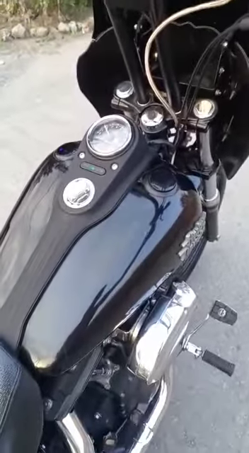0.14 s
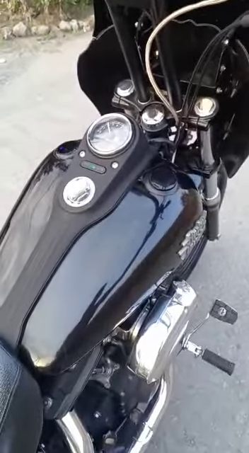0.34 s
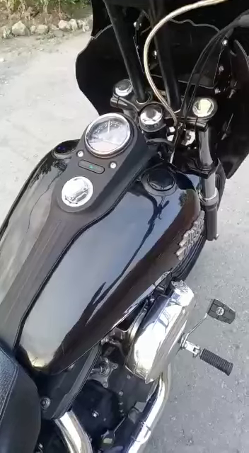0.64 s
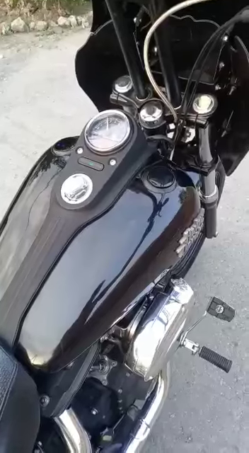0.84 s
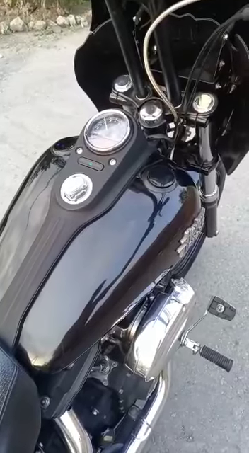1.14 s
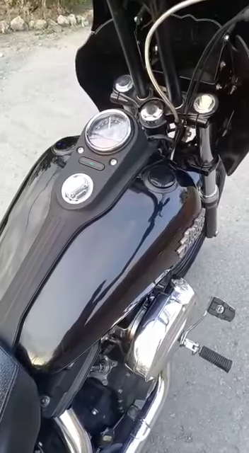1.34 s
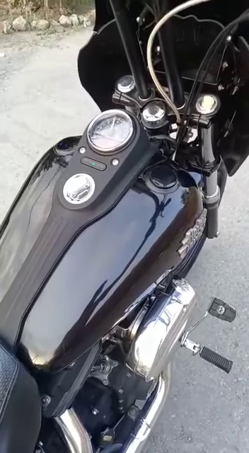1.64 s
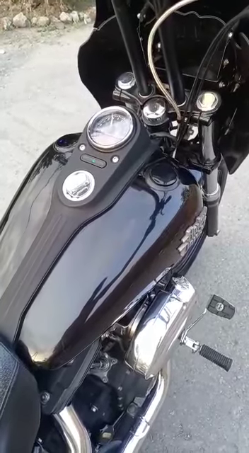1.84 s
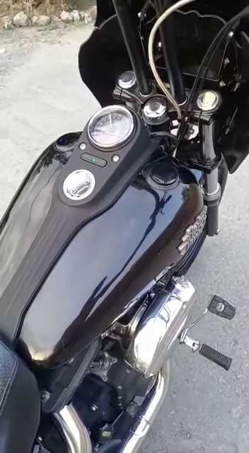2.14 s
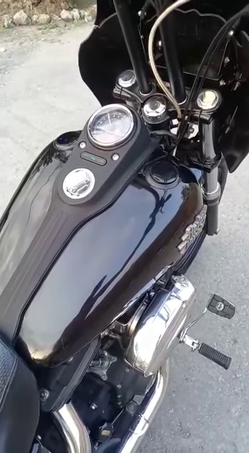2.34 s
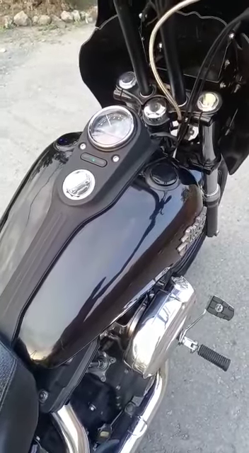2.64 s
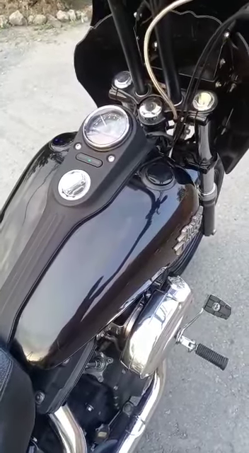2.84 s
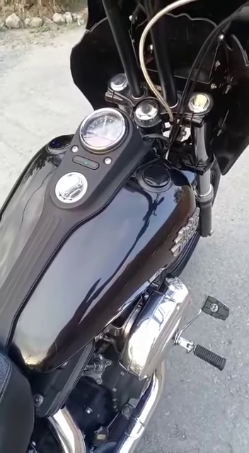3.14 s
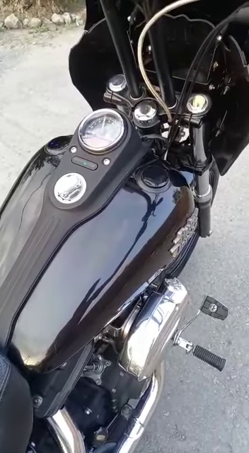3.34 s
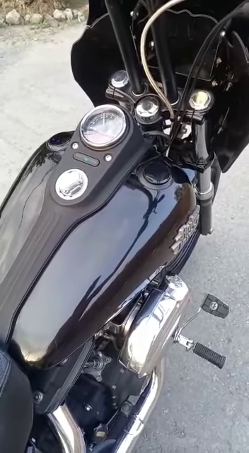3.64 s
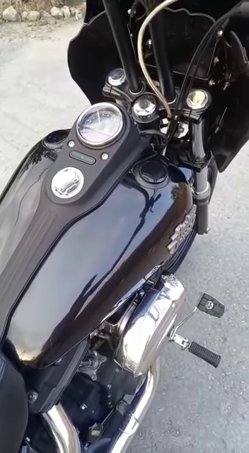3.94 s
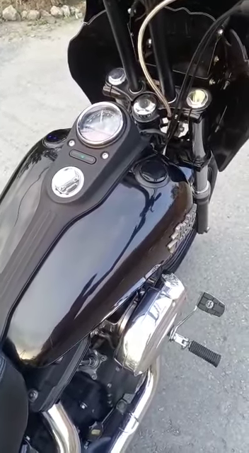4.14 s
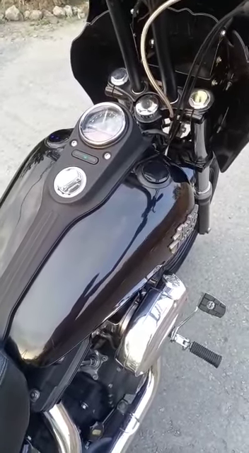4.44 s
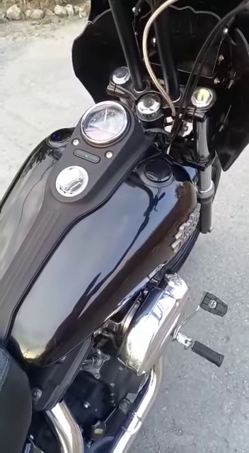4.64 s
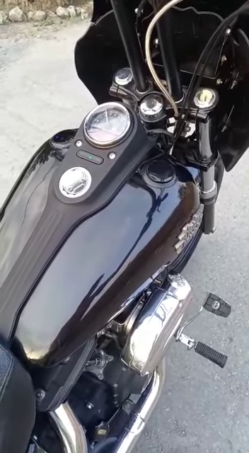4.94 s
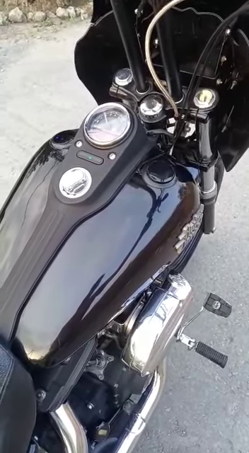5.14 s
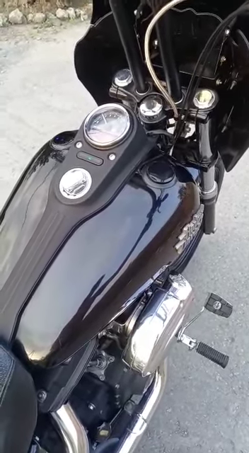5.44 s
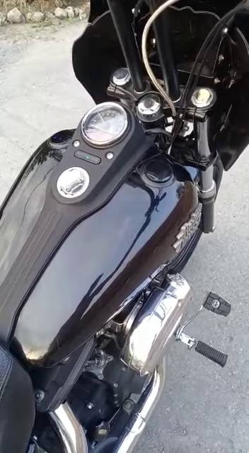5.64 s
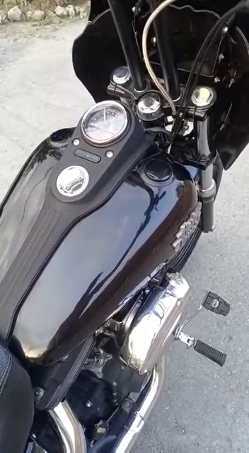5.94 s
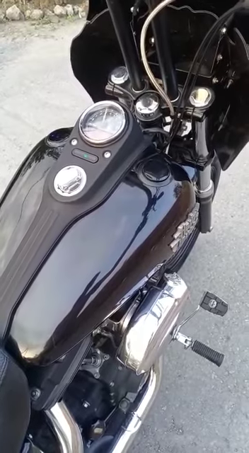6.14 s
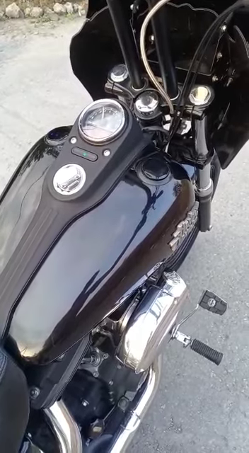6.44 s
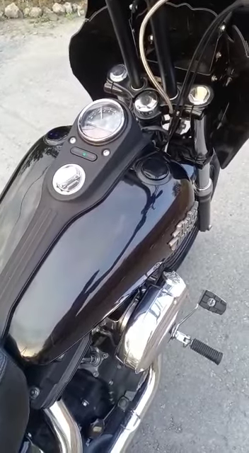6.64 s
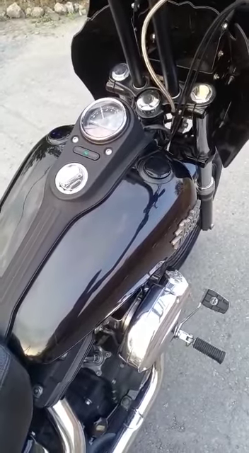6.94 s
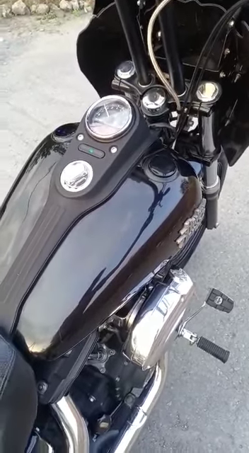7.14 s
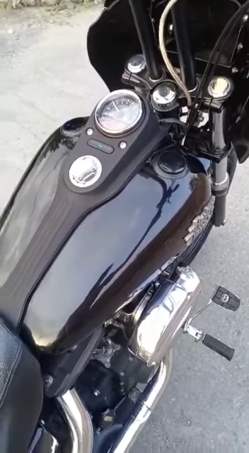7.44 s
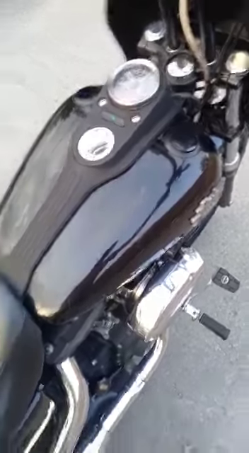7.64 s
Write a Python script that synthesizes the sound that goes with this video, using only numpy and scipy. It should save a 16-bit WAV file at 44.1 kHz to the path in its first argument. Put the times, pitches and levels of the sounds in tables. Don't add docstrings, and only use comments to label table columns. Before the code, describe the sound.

Five sharp throttle blips on a big twin-cylinder motorbike outdoors, loud cracking barks between uneven, thumping, ticking coasts back towards idle.

```python
import sys
import numpy as np
from scipy import signal
from scipy.fft import rfft, irfft, next_fast_len
from scipy.io import wavfile
from scipy.ndimage import uniform_filter1d

SR = 44100
rng = np.random.default_rng(int(sys.argv[2]) if len(sys.argv) > 2 else 0)


def volts_from_db(level):
    exponent = np.asarray(level, float) / 20
    return 10 ** exponent


def store_wav(level_fs):
    pcm = np.round(np.clip(np.atleast_2d(level_fs), -1, 1) * 32767)
    wavfile.write(sys.argv[1], SR, pcm.T.astype(np.int16))


N = 343098

# (cracked [s], open [s], full [s], shut [s], bark level [dB])
THROTTLE = [
    (.045, .075, .15, .25, -12.5),
    (1.04, 1.066, 1.15, 1.272, -11.5),
    (2.704, 2.798, 2.89, 2.972, -11),
    (3.82, 3.862, 3.96, 4.04, -11),
    (5.586, 5.672, 5.8, 5.858, -11),
]
CRACKED_DB, OPEN_DB, SHUT_DB = -14, -4, -4
TWIST_S, CLOSE_S = .022, .03
LET_GO_S = .014
BUILD_S = .035

# (first firing [s], start speed [cycles/s], top [s], top speed [cycles/s], climb
BLIPS = [
    (-.004, 9.4, .32, 26.5, .9),
    (1.041, 16.06, 1.298, 32.8, 1.056),
    (2.703, 11.9, 2.994, 31.03, 1.04),
    (3.801, 15.64, 4.062, 33.1, 1.13),
    (5.55, 10.5, 5.873, 31.37, 1.41),
]
COAST_S, IDLE_PER_S = 1.39, 9.6

# (frequency [Hz], width [Hz], level [dB])
PIPE_HOT = [(84, 31, 0), (152, 32, -11.5)]
# (frequency [Hz], width [Hz], level [dB])
PIPE_IDLE = [(86, 18, 0), (122, 45, -11), (180, 60, -19)]
# (frequency [Hz], width [Hz], level [dB])
PIPE_MOUTH = [(270, 60, -19)]
# (speed [cycles/s], pipe thump [dB], rasp [dB])
COASTING = [(9.9, -23.5, -44), (13.4, -23.5, -39), (18.1, -19, -36.5), (21.73, -19.5, -28.5),
            (27.35, -11.5, -31.5), (31.3, -12, -28.5)]
LOADED = {"thump": -11, "rasp": -19, "clatter": -34.5, "rattle": -28, "hiss": -12.5}
# (time [s], level change [dB])
BURNS = [(0, 13.5), (.36, 4), (.62, 2.5), (.76, 5.5), (.83, 5), (.88, 1), (2.11, 1), (2.14, -12),
         (2.4, 1.5), (2.703, 6), (2.735, -9), (3.55, 3), (4.76, -0.5), (4.84, -1.5), (5.14, 5.5),
         (5.37, 6.5), (5.42, -9), (6.51, 0), (7.13, -3), (7.22, 4), (7.36, -8), (7.4, 1.5), (7.55, -6),
         (7.6, 5), (7.67, 7), (7.74, -1), (7.78, 8)]
BURN_S = 0.013
GASP_DB, GASP_LAG_S, GASP_S = -10.5, 0.018, 0.015

# (share of a cycle [-], level [dB])
VALVES = [(0, -11), (.22, -15), (.48, -1), (.7, -26), (.88, 0.5)]
# (frequency [Hz], width [Hz], level [dB])
COVERS = [(944, 86, 3), (1538, 194, 1), (2310, 154, 3), (2590, 28, -11.5), (3527, 123, 0), (4900, 96, -7),
          (5230, 33, -16), (5960, 89, -2), (12000, 250, -18)]
# (frequency [Hz], width [Hz], level [dB])
PUMP = [(6190, 290, -5), (12500, 300, -12)]
# (frequency [Hz], density [dB/Hz])
CASES = [(710, -37), (1200, -3), (1550, -0.5), (1840, -4), (2240, 1), (2500, 1), (2920, 0.5), (3250, -7.5),
         (3650, -3.5), (4360, -9.5), (4860, -7.5), (5670, -9), (6170, -11.5), (6660, -9.5), (7600, -33.5),
         (9880, -54), (16700, -120)]
# (frequency [Hz], density [dB/Hz])
RASP = [(110, 0), (190, 0.5), (285, 1), (317, 1.5), (480, -6.5), (620, -58), (1060, -120)]
# (frequency [Hz], density [dB/Hz])
RATTLE = [(260, -47), (450, 0), (684, 2), (915, -1.5), (1070, -4.5), (1250, -11.5), (1620, -8.5),
          (2750, -120)]
# (frequency [Hz], density [dB/Hz])
HISS = [(4290, -38), (7300, -13.5), (7560, -9.5), (8430, -8), (9860, -3), (12100, -1.5), (15700, -2)]
CLATTER_DB, CLATTER_DB_PER_OCTAVE = -30.5, 12
RATTLE_DB, RATTLE_DB_PER_OCTAVE = -36.5, 8.5
HISS_DB = -14
STREET_DB = -52
# (time [s], gear level [dB])
GEAR_DRIFT = [(0, 2.5), (1, 0.5), (2.5, 0.5), (5, -0.5), (7.78, 1.5)]

# (frequency [Hz], width [Hz], level [dB])
TAPPET = [(1520, 70, 0), (2450, 110, -3)]
TAPPET_DB = -52

# (frequency [Hz], width [Hz], level [dB])
CRACK = [(250, 75, -2.5), (620, 150, -24), (122, 88, -2.5)]
# (frequency [Hz], width [Hz], level [dB])
AIRBOX = [(262, 34, 0), (600, 100, -28)]
# (frequency [Hz], density [dB/Hz])
SPIT = [(500, -24), (950, 9), (1500, -7), (2500, 9), (3400, -7), (7600, -28), (12000, -14), (16000, -14)]

# (time [s], peak [dB])
SNAPS = [
    (.259, -20),
    (1.277, -8.5),
    (2.975, -8.5),
    (4.042, -9),
    (5.588, -19),
    (5.856, -15),
]
# (time [s], frequency [Hz], level [dB])
WHINE = [
    (7.48, 624, -51),
    (7.516, 648, -60),
    (7.53, 657, -49),
    (7.564, 604.4, -48),
    (7.768, 590, -53),
    (7.78, 596, -43),
]

# (frequency [Hz], correlation [-])
ALIKE = [(60, 0.98), (130, 0.97), (290, 0.9), (640, 0.46), (1410, -0.02), (3100, 0.17), (6820, 0.09),
         (15000, -0.03)]
# (frequency [Hz], left minus right [dB])
LEAN = [(60, -0.5), (92, -0.5), (140, 0.0), (210, -0.5), (330, -1.0), (500, -2.5), (770, -2.0), (1170, 2.5),
        (1790, 1.5), (2740, -3.0), (4190, 6.5), (6410, 9.0), (9810, 0.5), (15000, -3.0)]
# (frequency [Hz], phase [rad])
LATE = [(40, .14), (85, .21), (170, .27), (400, .42)]
TOP_HZ = 15800


def unit(x):
    return x / np.sqrt(np.mean(x ** 2) + 1e-20)


def steady(x, span_s):
    power = np.abs(uniform_filter1d(x ** 2, int(span_s * SR)))
    return x / np.sqrt(power + 1e-9)


def along(points, hz):
    f, v = np.transpose(points)
    return np.interp(np.log(hz + 1), np.log(f + 1), v)


def curves(rows, outside=None):
    s, *cols = np.transpose(rows)
    return [np.interp(np.arange(N) / SR, s, col, outside, outside) for col in cols]


def filtered(x, response):
    m = next_fast_len(N + SR // 2)
    hz = np.fft.rfftfreq(m, 1 / SR)
    return irfft(rfft(x, m) * response(hz), m)[..., :N]


def modes(table):
    def response(f):
        total = 0
        for k, (center, width, db) in enumerate(table):
            damping = 1j * f * width
            total = total + (-1) ** k * volts_from_db(db) * damping / (center ** 2 - f * f + damping)
        return total
    return response


def soft(edge_hz):
    return lambda f: 1 / (1 - (f / edge_hz) ** 2 + 1.2j * f / edge_hz) ** 2


def speed(t):
    blips = np.array(BLIPS)
    current = np.maximum(np.searchsorted(blips[:, 0], t, "right") - 1, 0)
    start, low, top_s, top, bend = blips[current].T
    climb = low + (top - low) * np.clip((t - start) / (top_s - start), 0, 1) ** bend
    run_down = np.exp(-np.maximum(t - top_s, 0) / COAST_S)
    return np.maximum(climb * run_down, IDLE_PER_S)


def throttle():
    load = 0
    for cracked_s, open_s, full_s, shut_s, db in THROTTLE:
        path = [(cracked_s - TWIST_S, db - 15),
                (cracked_s, db + CRACKED_DB),
                (max(cracked_s, open_s - TWIST_S) + .001, db + CRACKED_DB + 3),
                (open_s, db + OPEN_DB),
                (full_s, db),
                (shut_s - CLOSE_S, db - 2),
                (shut_s, db + SHUT_DB),
                (shut_s + LET_GO_S, db - 18)]
        load = load + volts_from_db(curves(path, outside=-83)[0])
    return load


def strokes(share, lag_s, scatter_db, jitter_s):
    times = []
    starts = [row[0] for row in BLIPS]
    for start, end in zip(starts, starts[1:] + [N / SR]):
        t = np.arange(start, end, 1 / 1000)
        cycles = np.cumsum(speed(t)) / 1000
        times.append(np.interp(np.arange(share % 1, cycles[-1] - .3, 1), cycles, t))
    at = np.clip((np.concatenate(times) + lag_s) * SR, 0, N - 1).astype(int)
    chance = rng.standard_normal((len(at), 2))
    size = volts_from_db((scatter_db * np.ones(N))[at] * chance[:, 0])
    shift = (jitter_s * np.ones(N))[at] * SR * chance[:, 1]
    at = np.clip(at + shift, 0, N - 1).astype(int)
    return np.bincount(at, size, N)


def puffs(impulses, rise_s, t60_s):
    t = np.arange(SR // 10) / SR
    swell = (1 - np.exp(-t / rise_s)) * volts_from_db(-60 * t / t60_s)
    return np.abs(signal.fftconvolve(impulses, swell)[:N])


def rush(spectrum):
    def mid_side(hz):
        angle = np.arccos(np.clip(along(ALIKE, hz), -1, 1)) / 2
        return volts_from_db(along(spectrum, hz)) * np.array([np.cos(angle), np.sin(angle)])
    mid, side = filtered(rng.standard_normal((2, N)), mid_side)
    return unit(np.array([mid + side, mid - side]))


def bumps(rows, width_s):
    t = np.arange(N) / SR
    return sum(db * np.exp(-.5 * ((t - s) / width_s) ** 2) for s, db in rows)


def level(shut_db, layer, load):
    share = np.clip((20 * np.log10(load) + 30) / 14, 0, 1)
    return (1 - share) * shut_db + share * LOADED[layer]


def coasting(column):
    table = np.transpose(COASTING)
    return np.interp(speed(np.arange(N) / SR), table[0], table[column])


def exhaust(load):
    slow = np.clip((24 - speed(np.arange(N) / SR)) / 8, 0, 1)
    scatter_db, jitter_s = 1.2 + 1.8 * slow, .0004 + .0015 * slow
    puff = strokes(0, lag_s=-.0035, scatter_db=scatter_db, jitter_s=jitter_s)
    suck = strokes(.5, lag_s=-.0035, scatter_db=scatter_db, jitter_s=jitter_s)
    eddies = (.006 + .016 * slow) * rng.standard_normal(N)
    gas = puff - (.5 + .25 * slow) * suck + eddies
    flow = filtered(gas, soft(190))
    hot = filtered(flow, modes(PIPE_HOT))
    idle = filtered(flow, modes(PIPE_IDLE))
    mouth = filtered(gas, lambda f: modes(PIPE_MOUTH)(f) * soft(500)(f))
    rung = (1 - slow) * (hot + mouth) + slow * idle
    choked = 1 / (1 + 5 * load)
    gasps = bumps([(row[3] + GASP_LAG_S, GASP_DB) for row in THROTTLE], GASP_S)
    thump_db = level(coasting(column=1), "thump", load) + gasps + bumps(BURNS, BURN_S)
    return choked * volts_from_db(thump_db) * steady(rung, span_s=.07)


def gear(load):
    octaves = np.log2(speed(np.arange(N) / SR) / 30)
    clatter_db = level(CLATTER_DB + CLATTER_DB_PER_OCTAVE * octaves, "clatter", load)
    rattle_db = level(RATTLE_DB + RATTLE_DB_PER_OCTAVE * octaves, "rattle", load)
    rasp_db = level(coasting(column=2), "rasp", load)
    hiss_db = level(HISS_DB, "hiss", load)

    ticks = sum(volts_from_db(db) * strokes(share, lag_s=0, scatter_db=3, jitter_s=.0006) for share, db in VALVES)
    beat = puffs(ticks, rise_s=.002, t60_s=.022)
    snap = puffs(ticks, rise_s=.0015, t60_s=.025)
    knocks = puffs(ticks, rise_s=0.0033, t60_s=0.0085) * rng.standard_normal((2, N))

    covers = volts_from_db(-7.5) * unit(filtered(knocks, lambda f: modes(COVERS)(f) ** 2))
    cases = unit(1 + 1.6 * beat) * rush(CASES) + covers
    whistle = volts_from_db(-15) * unit(filtered(rng.standard_normal(N), lambda f: modes(PUMP)(f) ** 2))
    hiss = volts_from_db(hiss_db + 3.5) * unit(1 + 1.9 * snap + 3 * load * snap) * rush(HISS)
    rattle = volts_from_db(rattle_db + 2.0) * unit(1 + 1.0 * beat) * rush(RATTLE) / (1 + 2 * load)
    rasp = volts_from_db(rasp_db + 1) * unit(1 + .6 * beat) * rush(RASP) / (1 + 12 * load)
    clatter_gain = np.hypot(volts_from_db(clatter_db), volts_from_db(STREET_DB))
    return clatter_gain * (cases + hiss + whistle) + rattle + rasp


def tappet():
    strong = strokes(.86, lag_s=0, scatter_db=2, jitter_s=.002)
    weak = strokes(.33, lag_s=0, scatter_db=4, jitter_s=.002)
    knocks = puffs(strong + .6 * weak, rise_s=.001, t60_s=0.0071) * rng.standard_normal((2, N))
    return volts_from_db(TAPPET_DB) * unit(filtered(knocks, lambda f: modes(TAPPET)(f) ** 2))


def barks(load):
    fire = strokes(0, lag_s=-.0018, scatter_db=.7, jitter_s=.0002) * load
    gulp = strokes(.47, lag_s=-.0042, scatter_db=.7, jitter_s=.0004) * load
    regulp = strokes(.47, lag_s=.0034, scatter_db=4, jitter_s=.0003) * load
    crack = volts_from_db(53) * filtered(fire, modes(CRACK))
    airbox = volts_from_db(55.5) * filtered(gulp + .45 * regulp, modes(AIRBOX))

    filled = np.clip(np.roll(load, int(BUILD_S * SR)) / .03, 0, 1)
    filled = filled * 20 / speed(np.arange(N) / SR)
    spits = np.roll(fire / np.sqrt(load + .02) * filled, -int(.006 * SR))
    spit = volts_from_db(-4) * puffs(spits, rise_s=.0015, t60_s=.022) * rush(SPIT)
    breath = volts_from_db(-19.5) * puffs(gulp, rise_s=0.001, t60_s=0.036) * rush(HISS)
    return filtered(crack + airbox, soft(346)) + spit + breath


def snaps():
    out, t = np.zeros(N), np.arange(SR // 20) / SR
    for s, db in SNAPS:
        tone = np.sin(2 * np.pi * (520 * t + 9000 * t ** 2))
        pop = tone * volts_from_db(db - 60 * t / 0.026) * (1 - np.exp(-t / 0.00023))
        out[round(s * SR):][:len(t)] += pop
    return out


def whine():
    hz, db = curves(WHINE)
    flutter = uniform_filter1d(rng.standard_normal(N), int(0.01 * SR))
    fade_in = np.clip((np.arange(N) / SR - WHINE[0][0]) / 0.041, 0, 1)
    wobble_hz = 18 * unit(np.roll(flutter, SR))
    phase = 2 * np.pi * np.cumsum(hz + wobble_hz) / SR
    return volts_from_db(db + 5.5 + 5.1 * unit(flutter)) * fade_in * np.sin(phase)


def scene():
    load = throttle()
    engine = exhaust(load) + volts_from_db(curves(GEAR_DRIFT)[0]) * gear(load) + tappet()
    return engine + barks(load) + snaps() + whine()


def top_cut(x):
    return signal.sosfilt(signal.butter(12, 15820, fs=SR, output="sos"), x)


def record(dry):
    def bass_cut(hz):
        return (1j * hz / 44) ** 4 * soft(44)(hz)

    def ports(hz):
        left_over_right = volts_from_db(along(LEAN, hz)) * np.exp(-1j * along(LATE, hz))
        return left_over_right ** np.array([[.5], [-.5]])

    x = filtered(dry, lambda hz: bass_cut(hz) * ports(hz) * (hz < TOP_HZ))
    mix = x / (1 + np.abs(x) ** 8) ** (1 / 8)
    return top_cut(mix)


dry = scene()
out = record(dry)
store_wav(out)
```